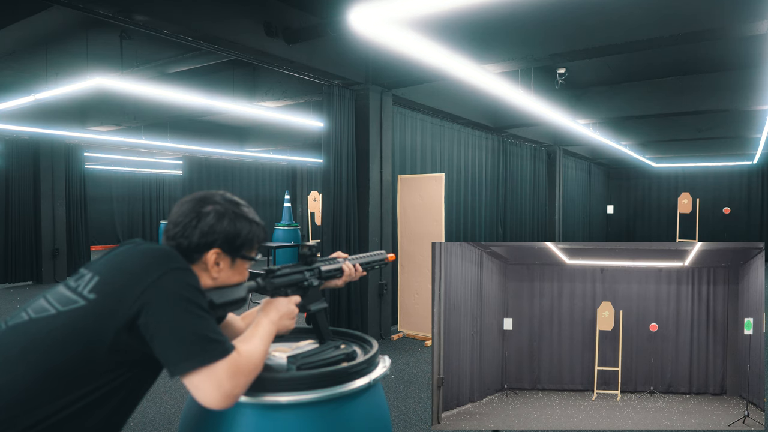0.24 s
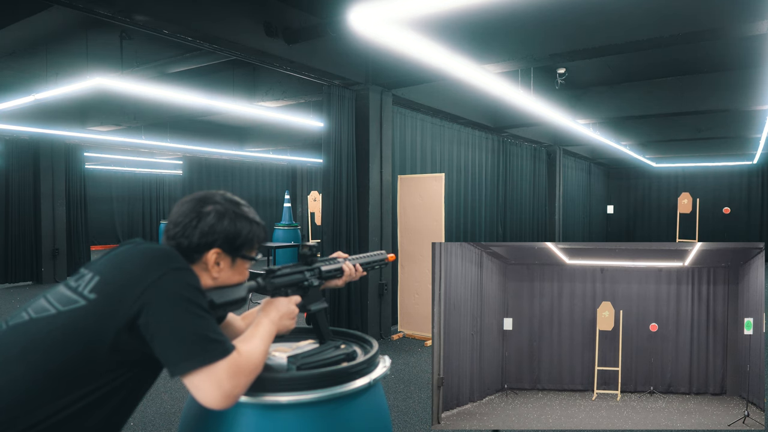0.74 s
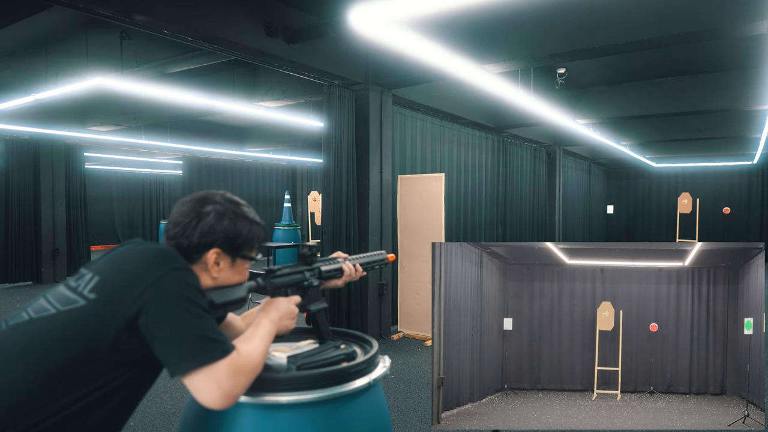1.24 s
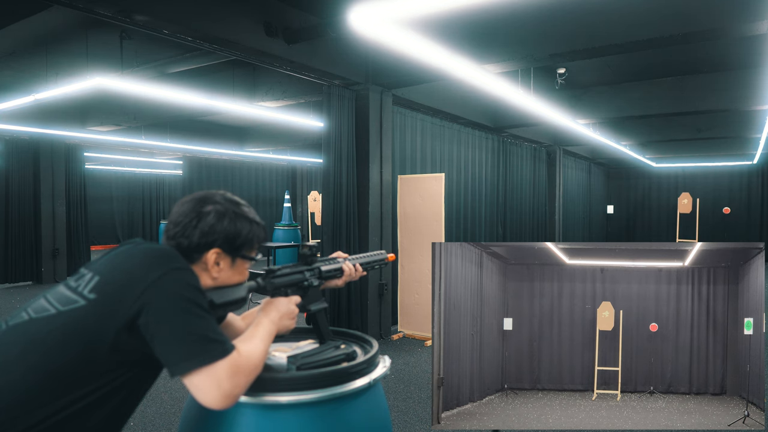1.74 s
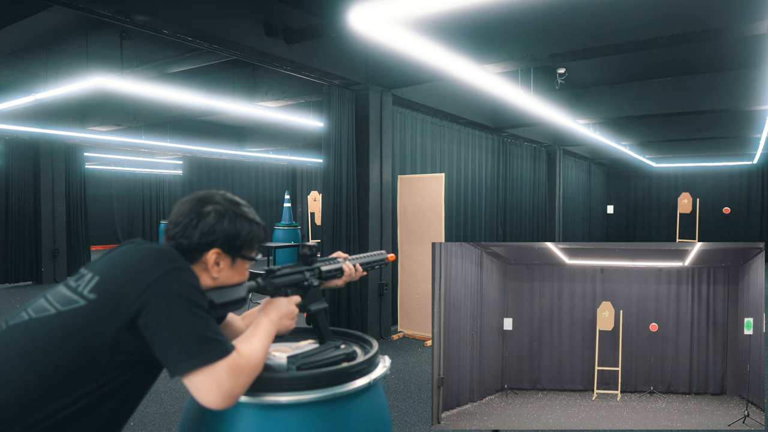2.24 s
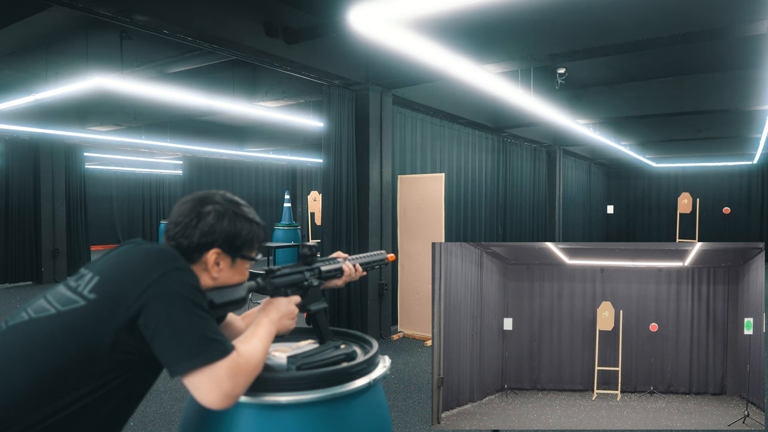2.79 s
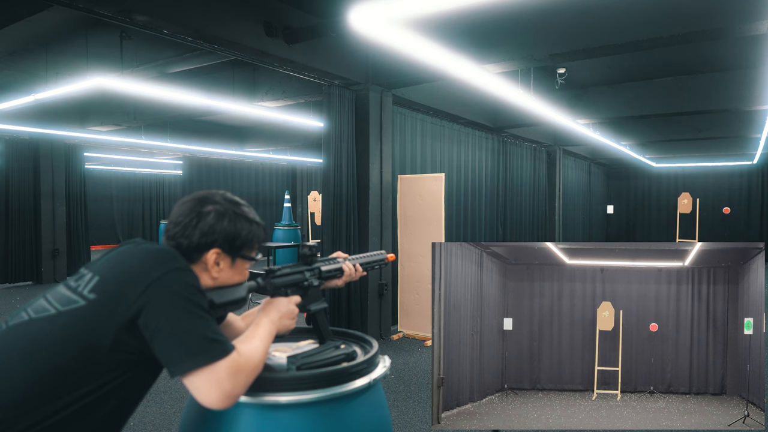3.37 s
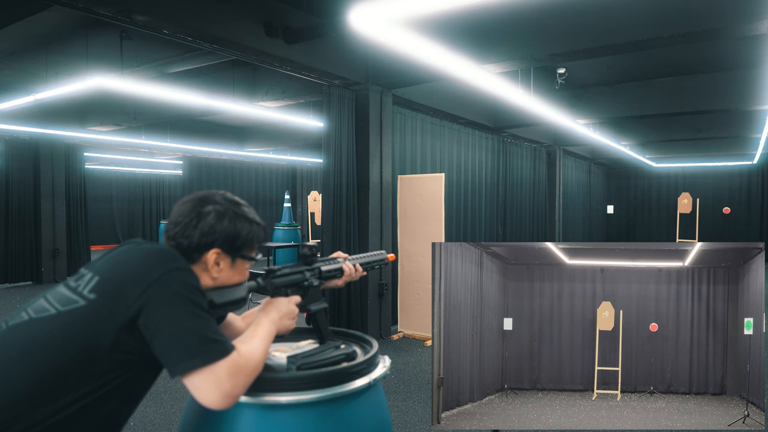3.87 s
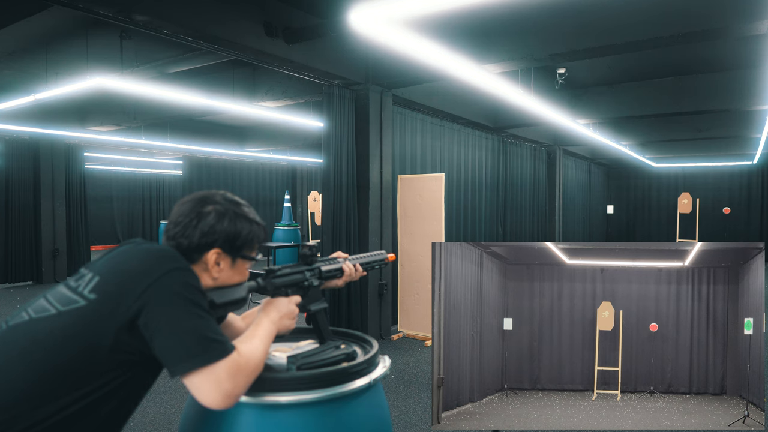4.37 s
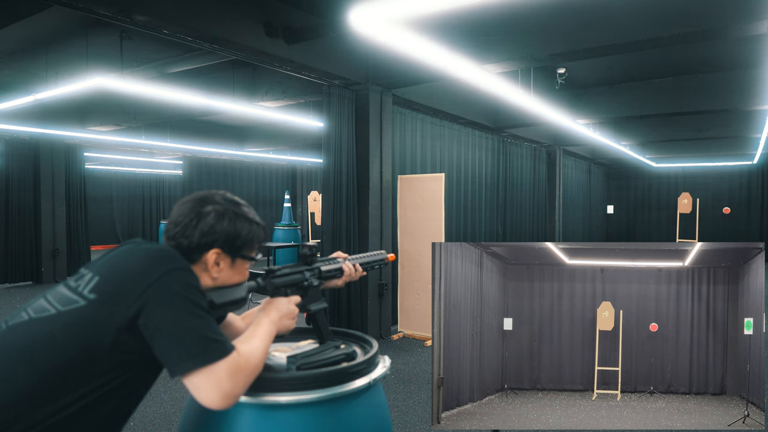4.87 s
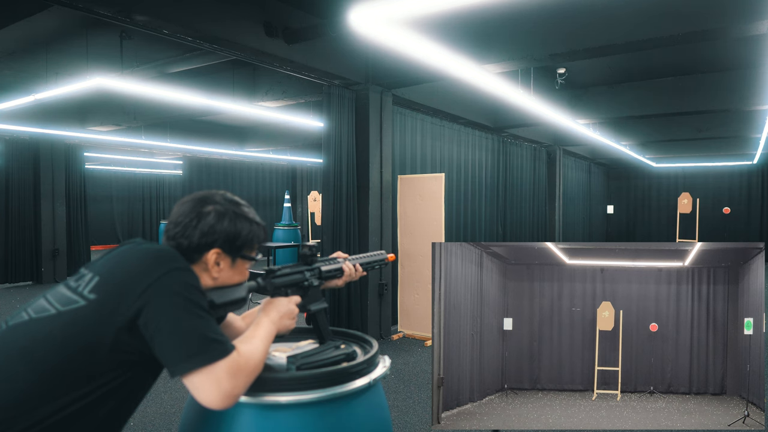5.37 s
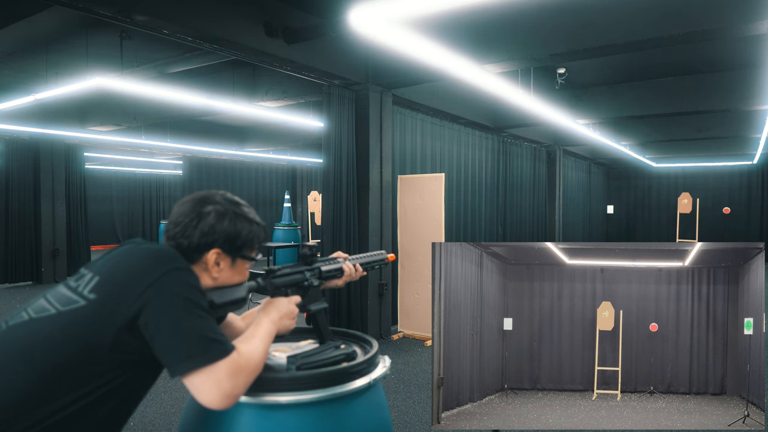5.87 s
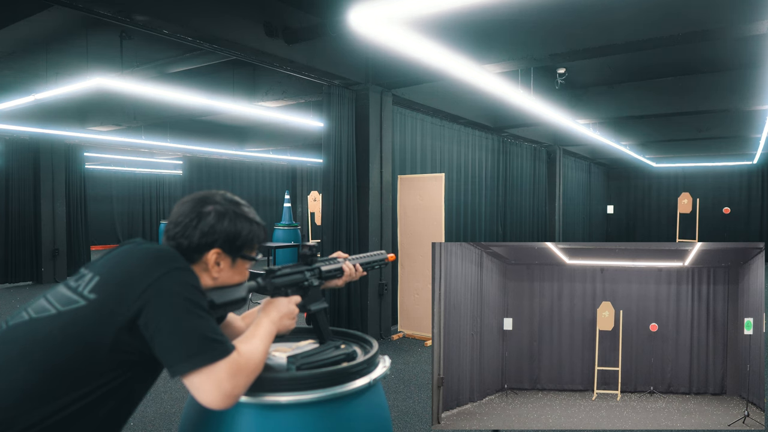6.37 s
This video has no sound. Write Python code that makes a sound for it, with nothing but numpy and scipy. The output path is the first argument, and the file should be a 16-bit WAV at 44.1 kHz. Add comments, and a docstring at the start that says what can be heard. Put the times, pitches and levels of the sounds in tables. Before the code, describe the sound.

A gas airsoft rifle fires slow single shots in an indoor range, each metallic crack followed by a close, sharp pellet smack on the backstop.

```python
"""Long indoor range: a gas airsoft rifle fires single shots; one is already dying away at the start.
Shots: filtered-noise gas spit, impulse-chatter report, bolt knocks on metal modes, shaped-noise hall.
About a quarter second later each pellet smacks the backstop, heard close by: damped modes, echoes, flutter.
Trigger clicks come before shots, stray pellets land far off, and ventilation noise hums underneath."""
import sys
import numpy as np
from scipy import signal
from scipy.fft import rfft, irfft
from scipy.io import wavfile

SR = 44100
rng = np.random.default_rng(int(sys.argv[2]) if len(sys.argv) > 2 else 0)


def transcribe(signal):
    """Save signal, clipped to [-1, 1], as a 16-bit WAV file at the path in sys.argv[1]."""
    frames = np.atleast_2d(signal).T
    limited = np.clip(frames, -1, 1)
    pcm = np.round(limited * 32767).astype(np.int16)
    wavfile.write(sys.argv[1], SR, pcm)


N = 292824

# Unless noted, table levels are relative; each player sets the final gain.


def amp(db):
    """Decibels to gain."""
    return 10 ** (np.asarray(db) / 20)


def read(points, hz):
    """Interpolates a table along a log-frequency axis."""
    f, value = np.transpose(points)
    return np.interp(np.log(hz + 1), np.log(f + 1), value)


def clock(seconds):
    """Sample times over a span, in seconds."""
    return np.arange(int(seconds * SR)) / SR


def add(mix, s, sound):
    """Mixes a sound in at time s, which may lie before the start."""
    at = round(s * SR)
    sound = sound[..., max(-at, 0):]
    part = mix[:, max(at, 0):][:, :sound.shape[-1]]
    part += sound[..., :part.shape[1]]


def tilted(colour, tilt_db):
    """A spectrum tilted by tilt_db per octave about 1 kHz."""
    return [(hz, db + tilt_db * np.log2(hz / 1000)) for hz, db in colour]


# Stereo width: f/Hz, side against mid level/dB
STEREO_WIDTH = [(30, -5), (90, -16.5), (200, -23.5), (450, -18.5), (900, -13), (2000, -11), (5000, -17),
                (13000, -5.5)]


def noise(colour, size, side_db=0.):
    """Nearly mono stereo noise of rms 1 with the given spectrum."""
    hz = np.fft.rfftfreq(size, 1 / SR)
    mid, side = rfft(rng.standard_normal((2, size)))
    side = side * amp(read(STEREO_WIDTH, hz) + side_db)
    left_right = np.array([mid + side, mid - side])
    x = irfft(left_right * amp(read(colour, hz)), size)
    return x / x.std()


def click(colour, size=2048):
    """A causal, minimum-phase impulse of energy 1 with the given spectrum."""
    hz = abs(np.fft.fftfreq(size, 1 / SR))
    log_gain = np.log(amp(read(colour, hz)))
    minimum_phase = np.exp(np.conj(signal.hilbert(log_gain)))
    x = np.fft.ifft(minimum_phase).real[:size // 2]
    return x / np.linalg.norm(x)


def burst(body, hold_s, decay_s):
    """A brief chatter of impulses, held and then dying, rings a body of energy 1."""
    t = clock(.04)
    envelope = np.exp(-np.maximum(t - hold_s, 0) / decay_s)
    chatter = rng.choice([-1., 1.], len(t)) * envelope
    return signal.fftconvolve(chatter, body / np.linalg.norm(body))


def ring(modes, tilt_db=0., size=1024):
    """Damped resonances after a single blow, tilted per octave about 4 kHz."""
    t = np.arange(size) / SR
    x = np.zeros(size)
    for hz, width_hz, db in modes:
        gain = amp(db + tilt_db * np.log2(hz / 4000))
        x += gain * np.exp(-np.pi * width_hz * t) * np.sin(2 * np.pi * hz * t)
    return x


def thump(hz, t60_s, rise_s=.005):
    """One resonance that builds up and dies away."""
    t = clock(2)
    return np.sin(2 * np.pi * hz * t) * amp(-60 * t / t60_s) * (1 - np.exp(-t / rise_s))


def echoed(x, echoes):
    """The direct sound from straight ahead and its first reflections from either side."""
    out = np.zeros((2, SR // 4))
    add(out, 0, x)
    for delay_s, db, pan in echoes:
        add(out, delay_s, amp(db) * x * np.array([[1 - pan], [1 + pan]]))
    return out


# Slow decay of the hall: f/Hz, t60/s
HALL_DECAY = [(50, 2.2), (140, 2.3), (300, 1.3), (600, 1.04), (1200, 0.79), (2500, 0.69), (5000, 0.7),
              (8000, .5), (15000, 0.41)]


def hall(colour, rise_s, hold_s, early_t60_ratio, late_db, droop_db=0., swell_db=0., side_db=0.,
         build_cycles=2.1):
    """Diffuse sound: held while it runs the length of the range, then a quick fall and a slow one."""
    hz, t, z = signal.stft(noise(colour, 2 * SR, side_db), SR, nperseg=512, noverlap=384)
    hz = hz[:, None]
    t60 = read(HALL_DECAY, hz)
    age = np.maximum(t - hold_s, 0)
    late = min(amp(late_db) ** 2, 1)
    early_power = (1 - late) * amp(-60 * age / (t60 * early_t60_ratio)) ** 2
    late_power = late * amp(-60 * age / t60) ** 2
    # each frequency needs a few cycles to fill the room
    build = 1 - np.exp(-(t + t[1]) * hz / build_cycles)
    # the far end swells the sound while the curtains soak up its treble
    travel = np.minimum(t / hold_s, 1) - .5
    travel_db = (swell_db - droop_db * np.log2((hz + 500) / 2500)) * travel
    z = z * np.sqrt(early_power + late_power) * build * amp(travel_db)
    x = signal.istft(z, SR, nperseg=512, noverlap=384)[1]
    return x * (1 - np.exp(-np.arange(x.shape[1]) / SR / rise_s))


# Ventilation spectra, low rumble and air hiss: f/Hz, level/dB per Hz
VENT_RUMBLE = [(12, -34.5), (20, -7), (67, -2), (97, -6), (145, -6.5), (166, -13.5), (189, -8.5),
               (285, -8.5), (319, -13.5), (376, -11), (400, -18.5), (520, -47.5), (880, -120)]
VENT_AIR = [(240, -40), (400, -8), (439, -1), (536, -10.5), (588, -9.5), (665, -11.5), (865, -11),
            (1290, -14.5), (3460, -21.5), (3800, -20.5), (4790, -28), (15900, -36.5)]
VENT_RUMBLE_RMS_DB, VENT_AIR_RMS_DB = -56, -60.5


def ventilation():
    """Steady shaped noise: low rumble plus air hiss."""
    rumble = amp(VENT_RUMBLE_RMS_DB) * noise(VENT_RUMBLE, N)
    return rumble + amp(VENT_AIR_RMS_DB) * noise(VENT_AIR, N, side_db=-4)


# Spent pellets landing far off: t/s, level/dB
STRAY_LANDINGS = [(.708, -63), (1.183, -66), (2.590, -66), (4.436, -60.5), (6.536, -57)]
# Their spectrum: f/Hz, level/dB per Hz
STRAY_SPECTRUM = [(200, -21.5), (1500, -6), (3000, 4.5), (5000, -1.5), (8000, -11.5), (15000, -20)]


def stray_pellets(mix):
    """Far landings reach the ear as diffuse hall sound only."""
    for s, db in STRAY_LANDINGS:
        landing = hall(STRAY_SPECTRUM, rise_s=.0053, hold_s=.016, early_t60_ratio=.23, late_db=-10)
        add(mix, s, amp(db - 1.5) * landing)


# Pellet snapping through the card target: t/s, level/dB
CARD_SNAPS = [(3.7872, -7.5), (5.6021, -4.5)]
# Card spectrum: f/Hz, level/dB per Hz
CARD_SPECTRUM = [(100, -8), (600, -8.5), (1200, 1), (2500, -5), (4500, 4), (6000, -1), (8000, -12.5),
                 (15000, -33)]


def card_target(mix):
    """The pierced card snaps as a short impulse chatter, and the hall answers."""
    for s, db in CARD_SNAPS:
        add(mix, s, amp(db - 3) * burst(click(CARD_SPECTRUM), hold_s=.0018, decay_s=.00087))
        tail = hall(CARD_SPECTRUM, rise_s=.0023, hold_s=.0052, early_t60_ratio=.28, late_db=-13)
        add(mix, s, amp(db - 13.5) * tail)


def backstop_flutter(start_hz, end_hz, glide_s, width_hz, decay_s):
    """The struck sheet shivers, its pitch sinking as the ripple spreads."""
    t = clock(.3)
    hz = end_hz + (start_hz - end_hz) * np.exp(-t / glide_s)
    smooth = signal.butter(2, width_hz / 2, fs=SR)
    complex_noise = rng.standard_normal(len(t)) + 1j * rng.standard_normal(len(t))
    shiver = signal.lfilter(*smooth, complex_noise)
    x = (shiver * np.exp(2j * np.pi * np.cumsum(hz) / SR)).real
    return x / x.std() * np.exp(-(t / decay_s) ** 2)


# Pellet on backstop: t/s, smack level/dB, hall level/dB, tilt/dB per octave, flutter level/dB
BACKSTOP_HITS = [(0.0296, 1.5, -16.5, 0, -24), (1.9486, 0, -13.5, -0.02, -21),
                 (3.8010, 1, -15.5, -0.5, -29.5), (5.6121, -3, -17, -1.5, -19.5)]
# Dead, wide backstop resonances: f/Hz, width/Hz, level/dB
BACKSTOP_MODES = [(830, 530, -5.5), (2250, 1400, 2), (4536, 2800, 2), (10000, 6000, -10)]
# Curtains and floor near the backstop: delay t/s, level/dB
CURTAIN_ECHOES = [(.0068, -13.5), (.0088, -16.5), (0.0102, -20.5), (0.0174, -17.5), (0.037, -18)]
# Hall spectrum of a hit: f/Hz, level/dB per Hz
HIT_HALL_SPECTRUM = [(30, -23.5), (85, -12), (150, -2), (220, 1.5), (330, 1), (600, 2.5), (800, 0.5),
                     (1100, 2), (1700, -2), (3800, -4), (5500, -9), (7500, -13), (11000, -19), (15500, -26)]


def backstop(mix):
    """The smack rings heavily damped modes, reflects nearby, excites the hall and flutters the sheet."""
    small_patch = signal.butter(3, 520, "high", fs=SR)  # so small a dent radiates no bass
    for s, db, hall_db, tilt_db, flutter_db in BACKSTOP_HITS:
        smack = signal.lfilter(*small_patch, ring(BACKSTOP_MODES, tilt_db))
        add(mix, s, amp(db) * smack)
        add(mix, s + .0011, amp(db - 2) * smack)  # the wall just behind
        for delay_s, echo_db in CURTAIN_ECHOES:  # curtain folds smear the later reflections
            add(mix, s + delay_s, amp(db + echo_db) * burst(smack, hold_s=.0012, decay_s=.0012))
        tail = hall(tilted(HIT_HALL_SPECTRUM, tilt_db), rise_s=.0013, hold_s=.012,
                    early_t60_ratio=.54, late_db=-9.5, side_db=-7, build_cycles=6.8)
        add(mix, s, amp(hall_db) * tail)
        flutter = backstop_flutter(start_hz=1048.5, end_hz=351.4, glide_s=.045, width_hz=380, decay_s=.065)
        add(mix, s, amp(flutter_db) * flutter)


# Trigger take-up and break: t/s, level/dB, tilt/dB per octave
TRIGGER_CLICKS = [(1.6237, -54, 4), (1.6712, -37, -0.5), (3.5313, -45, 0), (5.3176, -47, 2.5)]
# Sear spectrum: f/Hz, level/dB per Hz
SEAR_SPECTRUM = [(60, -14), (350, -2), (650, -3), (950, 3), (1300, -3), (1800, 3), (2500, -7), (5000, -7),
                 (6300, -24), (15000, -38)]


def trigger(mix):
    """The sear clicks, the hall answers and the hammer swing adds a soft thump."""
    for s, db, tilt_db in TRIGGER_CLICKS:
        sear = tilted(SEAR_SPECTRUM, tilt_db)
        add(mix, s, amp(db - 2) * burst(click(sear), hold_s=.002, decay_s=.002))
        tail = hall(sear, rise_s=.002, hold_s=.01, early_t60_ratio=.2, late_db=-10, droop_db=4)
        add(mix, s, amp(db - 15.5) * tail)
        add(mix, s + .0066, amp(-42.5) * thump(hz=530, t60_s=.08, rise_s=.008))


# Every shot: t/s, report level/dB, hall level/dB, bolt against report level/dB, bolt-home delay t/s
SHOT_EVENTS = [(-.198, -19.5, -13.5, -3, .11), (1.7193, -2.5, -14.5, -3.5, .1277),
               (3.5710, -2, -15, -3.5, .098), (5.3770, -2, -14.5, -1.5, 0.096)]
# Barrel and rail modes: f/Hz, level/dB
BARREL_MODES = [(1015, -31), (1208, -32.5), (1566, -30), (1677, -31.5), (1739, -33.5), (1965, -34),
                (3979, -31.5), (4091, -31.5), (4295, -32), (4623, -33), (4819, -33.5), (4920, -32)]


def barrel(mix):
    """Barrel and rail sing on after a shot; the higher modes die sooner."""
    for s, shot_db, *_ in SHOT_EVENTS:
        for hz, db in BARREL_MODES:
            mode = thump(hz, t60_s=.48 * (hz / 2000) ** -.4, rise_s=.02)
            add(mix, s + rng.uniform(0, .004), amp(shot_db + db + 7.5) * mode)


# Receiver modes: f/Hz, width/Hz, level/dB
RECEIVER_MODES = [(1692, 92, -7), (2730, 140, -10.5), (4250, 200, -2.5), (4950, 300, -0.5),
                  (5500, 290, -6.5), (6900, 400, -10)]
# Broad steel tick: f/Hz, level/dB per Hz
STEEL_SPECTRUM = [(60, -28.5), (700, -16.5), (2500, -4.5), (6000, -3.5), (9000, -21.5), (15000, -15)]


def receiver(tilt_db, steel_db):
    """The rifle's metal body: a broad tick and a few well damped modes."""
    body = ring(RECEIVER_MODES, tilt_db)
    return body / np.linalg.norm(body) + amp(steel_db) * click(STEEL_SPECTRUM)


RATTLE_MIN_DB, RATTLE_HALF_RANGE_DB, RATTLE_SPAN_S = -19, 3, .125  # min against the report


def loose_parts(mix):
    """Loose parts shake after a shot: ticks of random time, level and brightness."""
    for s, shot_db, *_ in SHOT_EVENTS:
        for when, size, bright in rng.uniform(-1, 1, size=(14, 3)):
            tick = burst(receiver(4 * bright, steel_db=-3.5), hold_s=.0012, decay_s=.0005)
            tick_db = shot_db + RATTLE_MIN_DB + RATTLE_HALF_RANGE_DB * (size + 1)
            add(mix, s + .02 + RATTLE_SPAN_S * (when + 1) / 2, amp(tick_db) * tick)


# Bolt knocks: delay after the report, level against the rear-stop knock, tilt per octave
COCK_S, COCK_DB, COCK_TILT_DB = .0372, -4, 6.5  # rides over the hammer
STOP_S, STOP_TILT_DB = .0434, 4  # strikes its rear stop
REBOUND_GAP_S, REBOUND_LOSS_DB, REBOUND_TILT_DB = .024, 4, 0  # buffer spring surges, each knock weaker
HOME_DB, HOME_TILT_DB = -6, -8  # closes with a dull knock


def bolt_cycle(home_s, count=3):
    """One trip of the bolt, back and home: rows of (delay s, relative dB, dB per octave)."""
    rebounds = [(STOP_S + k * REBOUND_GAP_S, -k * REBOUND_LOSS_DB, REBOUND_TILT_DB)
                for k in range(1, count + 1)]
    cock = (COCK_S, COCK_DB, COCK_TILT_DB)
    return [cock, (STOP_S, 0, STOP_TILT_DB), *rebounds, (home_s, HOME_DB, HOME_TILT_DB)]


# Bolt unlocking, alike on every shot: t/s after the report, level/dB
UNLOCK_KNOCKS = [(.0042, -9), (0.0157, -4.5), (0.0217, -9.5)]


def bolt(mix):
    """The bolt unlocks, travels back and closes, each knock ringing the receiver."""
    knocks = []
    for s, shot_db, _, bolt_db, home_s in SHOT_EVENTS:
        knocks += [(s + delay_s, db, 0) for delay_s, db in UNLOCK_KNOCKS]
        knocks += [(s + delay_s, shot_db + bolt_db + db, tilt_db)
                   for delay_s, db, tilt_db in bolt_cycle(home_s)]
    for s, db, tilt_db in knocks:
        knock = burst(receiver(tilt_db, steel_db=-6), hold_s=.0018, decay_s=.0008)
        add(mix, s, amp(db - 2) * knock)


# Floor, ceiling and near wall answering the report: delay t/s, level/dB, pan -1 to 1
NEAR_WALL_ECHOES = [(.0032, -11.5, .1), (.0100, -10, -0.4), (.0140, -12.5, -.1)]
# Side walls: first return, spacing, first level, loss per bounce
FLUTTER_S, FLUTTER_GAP_S, FLUTTER_DB, FLUTTER_LOSS_DB = .04, .0095, -13.5, 2


def wall_echoes(count=4):
    """Near reflections, then the report bouncing from side to side: rows of (delay s, dB, pan)."""
    bounces = [(FLUTTER_S + k * FLUTTER_GAP_S, FLUTTER_DB - k * FLUTTER_LOSS_DB, (-1) ** k)
               for k in range(count)]
    return list(NEAR_WALL_ECHOES) + bounces


# Gas spit, report and hall spectra: f/Hz, level/dB per Hz
GAS_SPECTRUM = [(60, -17.5), (220, -11), (550, 2), (800, -2), (1500, 0.5), (5500, 3.5), (8000, -3.5),
                (15000, -14.5)]
REPORT_SPECTRUM = [(40, -23.5), (200, -17), (450, -10.5), (800, -2.5), (1200, 3), (2500, -0.5), (4000, 2),
                   (5500, -6), (8000, -11), (15000, -14.5)]
SHOT_HALL_SPECTRUM = [(30, -12.5), (85, -9.5), (140, 2), (210, -3.5), (330, -3), (700, 0), (1100, -0.5),
                      (1650, 1), (2300, -3), (3300, -2), (4500, 4), (7500, -7.5), (11000, -14.5),
                      (15500, -20.5)]
# Standing waves of the hall: f/Hz, level/dB, t60/s
STANDING_WAVES = [(78.4, -40.5, 2.4), (131.2, -33, 1.3), (161.9, -34, 1.2)]


def shot_hall():
    """One diffuse hall tail of a shot."""
    return hall(SHOT_HALL_SPECTRUM, rise_s=.002, hold_s=.12, early_t60_ratio=.49, late_db=-6.5,
                droop_db=2.5, swell_db=4.5, side_db=-3, build_cycles=1.9)


def rifle(mix):
    """The valve spits, the muzzle pops, the recoiling bolt thumps the stock and the hall rings."""
    lead_s = .0085
    t = clock(lead_s)
    spit = noise(GAS_SPECTRUM, len(t), side_db=-31) * np.sqrt(t / lead_s)
    pop = burst(click(REPORT_SPECTRUM), hold_s=.0028, decay_s=.0015)  # shared by every shot
    boom = sum(amp(db) * thump(hz, t60_s, rise_s=.03) for hz, db, t60_s in STANDING_WAVES)
    stock_echoes = [(.006, -16, .98), (.0096, -13.5, -1)]
    stock = echoed(thump(hz=140, t60_s=.1, rise_s=.004), stock_echoes)
    common_tail = shot_hall()  # rifle and walls stay put, so the shots share part of one tail
    for s, db, hall_db, _, _ in SHOT_EVENTS:
        report = pop + amp(-10) * burst(click(REPORT_SPECTRUM), hold_s=.0009, decay_s=.0017)
        add(mix, s - lead_s, amp(db - 13.5) * spit)
        add(mix, s, amp(db) * echoed(report, wall_echoes()))
        add(mix, s - .0035, amp(db + 1.5) * thump(hz=440, t60_s=.017, rise_s=.0045))
        add(mix, s + .035, amp(db - 13.5) * stock)
        add(mix, s + .035, boom)
        add(mix, s, amp(hall_db - 1.7) * (shot_hall() + .5 * common_tail))


def scene():
    """Ventilation under the pellet landings and the rifle."""
    mix = ventilation()
    stray_pellets(mix)
    card_target(mix)
    backstop(mix)
    trigger(mix)
    barrel(mix)
    loose_parts(mix)
    bolt(mix)
    rifle(mix)
    return mix


EDGE_HZ = 16050


def record(dry):
    """The loudest peaks overload; then the band limit."""
    clipped = np.clip(dry, -1, 1)
    low_pass = signal.firwin(511, EDGE_HZ, window=("kaiser", 8), fs=SR)
    return signal.oaconvolve(clipped, low_pass[None], "same")


dry = scene()
out = record(dry)
transcribe(out)
```